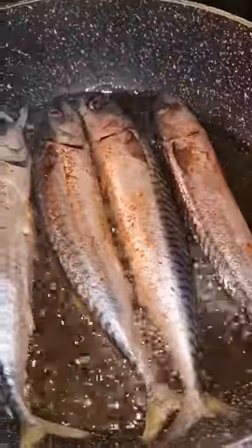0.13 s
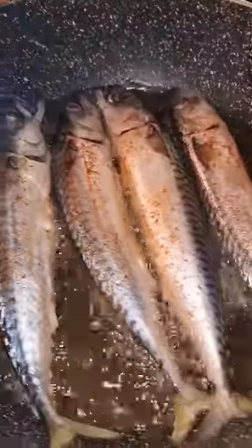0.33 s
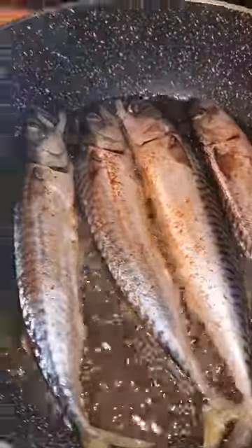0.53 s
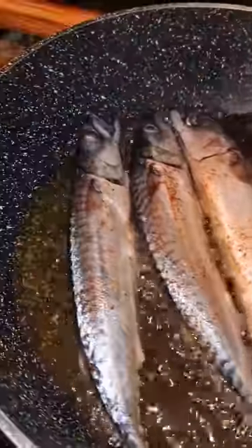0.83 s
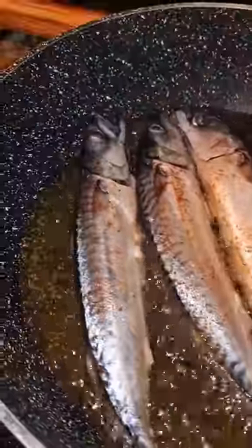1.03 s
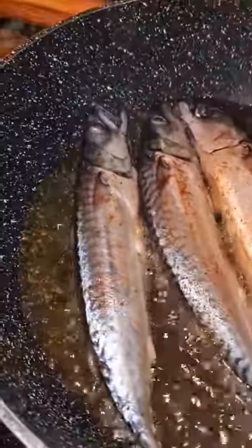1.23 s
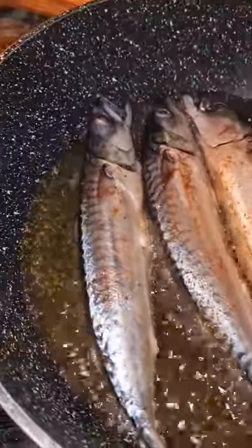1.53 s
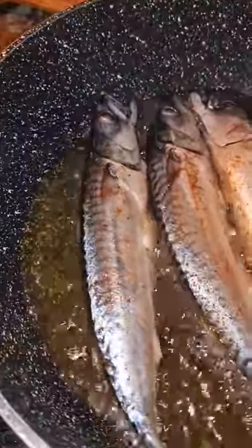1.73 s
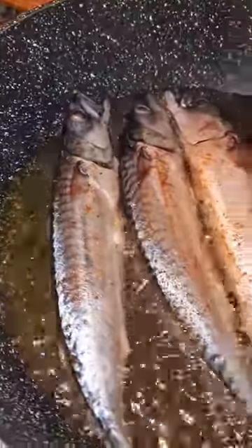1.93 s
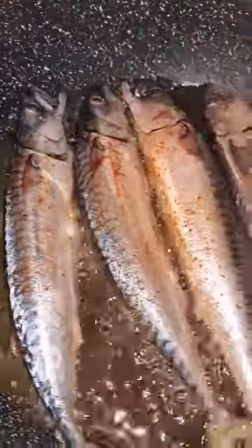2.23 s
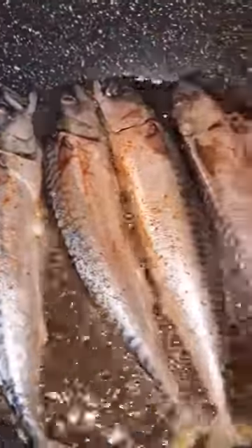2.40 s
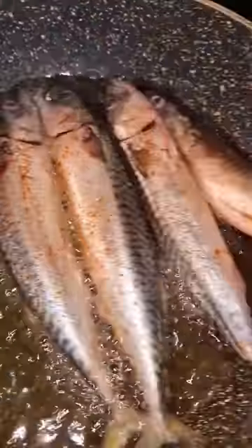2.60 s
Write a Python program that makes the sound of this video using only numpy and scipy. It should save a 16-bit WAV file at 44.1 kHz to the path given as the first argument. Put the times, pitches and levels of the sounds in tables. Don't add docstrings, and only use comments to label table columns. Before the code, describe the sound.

Whole fish fry in bubbling oil, fizzing densely from start to end while larger bubbles pop, the metal pan pings and droplets snap; recorded very close indoors, with dull handling bumps over a quiet low kitchen rumble.

```python
import sys
import numpy as np
from scipy import signal
from scipy.fft import rfft, irfft
from scipy.io import wavfile

SR = 44100
rng = np.random.default_rng(int(sys.argv[2]) if len(sys.argv) > 2 else 0)


def invert_db(x):
    u = np.asarray(x, float) / 20
    return 10 ** u


def unload_audio(sound):
    columns = np.transpose(np.atleast_2d(sound))
    steps = np.round(np.clip(columns, -1, 1) * 32767)
    wavfile.write(sys.argv[1], SR, steps.astype(np.int16))


N = 121716

# (time [s], level [dB])
BOIL = [
    (0.0, -24),
    (0.15, -24),
    (0.15, -23),
    (1.1, -26.5),
    (1.53, -26.5),
    (1.72, -25.5),
    (2.17, -28),
    (2.24, -25),
    (2.76, -25.5),
]
# (frequency [Hz], level per Hz [dB])
SIZZLE_COLOUR = [(350, 1), (480, -21.5), (1100, -7), (2600, -2.5), (8600, -5.5), (9700, -13.5),
                 (15000, -13), (16000, -6)]
# (frequency [Hz], width [Hz], level [dB])
PAN_RINGS = [(1177, 90, 6.5), (2220, 40, -2.5), (3024, 62, 0.5)]
# (frequency [Hz], left minus right [dB])
LEFT_LEAN = [(60, 2), (300, -10), (650, 6), (1400, 5.5), (2800, 0), (6000, 3), (15000, 5)]
# (frequency [Hz], likeness [0-1])
LIKENESS = [(60, 1), (180, 1), (550, 0.62), (1100, 0.42), (2500, 0), (6000, 0.09)]
# (frequency [Hz], phase [radians])
LEFT_LEAD = [(300, -0.31), (950, 1), (1210, 2.35), (1640, -1.1), (2150, -2.1)]
# (time of peak [s], peak level [dB], pitch [Hz])
POPS = [(.0205,-14,1200),(.1337,-14.5,1400),(.1452,-20,1290),(.1916,-15.5,1600),(.2928,-14.5,1090),(.3652,-17.5,1170),
        (.5512,-16,1400),(.5747,-16,1320),(.7283,-21,1043),(.791,-18,1790),(1.0536,-12,1730),(1.117,-23.5,600),
        (1.4572,-12.5,1380),(1.7011,-12.5,1400),(1.7176,-11.5,1870),(1.7395,-18,1330),(1.8573,-17.5,1280),(1.873,-7,1760),
        (1.8722,-15.5,1170),(1.9311,-19.5,960),(2.2903,-13.5,1720),(2.373,-21,1280),(2.4155,-19.5,810),(2.484,-22,930),(2.5692,-12.5,1450),
        (.428,-27,1070),(.5725,-28,690),(.687,-31.5,700),(.874,-31,644),(.89,-25.5,512),(1.078,-21,880),(1.163,-23,1170),(1.232,-52,820),
        (1.434,-25,900),(1.612,-30,830),(2.232,-20.5,1100),(2.322,-28.5,900),(2.389,-20,1180),(2.597,-25.5,734)]
# (time of peak [s], peak level [dB], pitch [Hz])
PAN_POPS = [(.019,-16,2210),(.1053,-13.5,2286),(.1706,-22,3070),(.3846,-14,2880),(.4819,-14.5,2540),(.515,-17,2230),
            (.66,-18,2220),(.7308,-14.5,2220),(.8556,-11.5,2150),(.9,-13.5,2200),(.9309,-15,2200),(.9593,-12,2130),
            (.9698,-16,1930),(.9927,-14,3250),(1.0157,-12.5,2220),(1.0716,-11.5,2240),(1.3774,-15.5,2170),(1.4357,-9.5,2250),
            (1.5749,-13,2240),(1.654,-17,2390),(1.73,-15.5,2280),(1.829,-15.5,3140),(2.216,-10.5,2970),(2.3053,-13,2160),
            (2.4988,-17,2980),(2.627,-13,2130),(2.651,-21,1990),(2.6974,-21,2000)]
# (time of peak [s], peak level [dB], pitch [Hz])
WEAK_PAN_POPS = [(.052,-38,2220),(.437,-20,1980),(.488,-19,2300),(.521,-21,1590),(.534,-22,2220),(.552,-13,2190),(.611,-28,2200),
                 (.647,-17,2270),(.7135,-37,2170),(.752,-21,2210),(.79,-20,2260),(.822,-14,3400),(.845,-21,2000),(.945,-30,2100),
                 (1.135,-21,1930),(1.201,-17,2300),(1.256,-32,3100),(1.271,-25,2110),(1.278,-17,2070),(1.299,-13,3150),(1.345,-22,1830),
                 (1.585,-19.5,1820),(1.613,-25,2200),(1.702,-15,2960),(1.037,-16,2250),(1.829,-19,2300),(1.886,-22,3000),(1.943,-18,2220),
                 (1.983,-22.5,2170),(2.093,-20,2220),(2.121,-16,2200),(2.13,-18,3030),(2.19,-21.5,1650),(2.263,-19,3170),(2.322,-26,2920),
                 (2.36,-24,2940),(2.485,-21,2950),(2.515,-22,3080),(2.535,-27,3000),(2.603,-17,2070),(2.637,-19,2200),(2.635,-14,3130),
                 (2.663,-16.5,2030),(2.715,-14,2330)]
# (time of peak [s], peak level [dB], centre [Hz])
SPITS = [(0.0802,-10.5,4300),(0.105,-11.5,6700),(0.1394,-10,4200),(0.266,-16,4130),(0.39,-13,7460),(0.5612,-11.5,8300),
         (0.642,-13,4700),(0.6603,-11.5,6860),(0.818,-11.5,6300),(1.023,-12,5500),(1.06,-13,6400),(1.095,-17,7000),(1.304,-11,7500),(1.729,-28,7540),
         (1.845,-16,7400),(2.02,-14.5,3650),(2.0774,-15,4560),(2.2386,-13,5370),(2.2655,-15,4010),(2.2953,-17,8100),(2.33,-23,11000),
         (2.3674,-14,7660),(2.4,-11,12800),(2.398,-14,7500),(2.4206,-17,6960),(2.234,-20,13100)]
# (time [s], peak level [dB], pitch [Hz], length [s])
BUMPS = [(.005, -36, 314, 0.032), (0.192, -28.5, 126, 0.029), (0.209, -20.5, 183.3, 0.058),
         (0.235, -30.5, 175.7, 0.1), (.3, -31.5, 132, 0.11), (0.348, -20.5, 249, 0.044),
         (0.367, -23.5, 162, 0.033), (0.424, -23, 172, 0.015), (0.689, -32, 82, 0.058),
         (0.868, -24, 150, 0.048), (1.026, -27.5, 152, 0.025), (1.08, -20.5, 132, 0.024),
         (1.098, -20, 182, 0.041), (1.138, -25.5, 101, 0.052), (1.161, -30.5, 152, 0.054),
         (1.21, -24, 104, 0.062), (1.286, -35, 101.4, 0.098), (1.367, -30.5, 102, 0.038),
         (1.514, -33.5, 116, 0.017), (2.273, -18.5, 177, 0.013), (2.369, -35, 123, 0.055),
         (2.596, -33.5, 126, 0.022)]
# (frequency [Hz], level per Hz [dB])
RUMBLE_COLOUR = [(30, -5), (70, -18), (99, 3.5), (135, -10), (290, -9), (500, -20)]


def evened(x):
    return x / np.sqrt(np.mean(x ** 2) + 1e-20)


def read(points, hz):
    f, value = np.transpose(points)
    return np.interp(np.log(hz + 1), np.log(f + 1), value)


def add(mix, s, sound):
    part = mix[:, max(round(s * SR), 0):][:, :sound.shape[1]]
    part += sound[:, :part.shape[1]]


def shaped(x, gain):
    freqs = np.fft.rfftfreq(x.shape[-1], 1 / SR)
    return irfft(rfft(x) * gain(freqs), x.shape[-1])


def wander(top_hz, count):
    def drift(hz):
        return 1 / np.sqrt((hz + 1.4) * (1 + (hz / top_hz) ** 4)) * (hz > 3.0)
    return evened(shaped(rng.standard_normal((count, N)), drift))


def sides(left_minus_right_db):
    half = left_minus_right_db / 2
    return invert_db(np.array([[half], [-half]]))


def bubble(hz, cycles, rise=5.4):
    u = np.arange(0, 4, hz / cycles / SR * 2)
    shape = (1 - np.exp(-rise * u)) ** 1.3 * np.exp(-1.5 * u)
    return shape / shape.max() * np.sin(np.pi * cycles * u)


def pan_gain(hz):
    peaks = sum(invert_db(db) ** 2 / (1 + (2 * (hz - f) / width) ** 2) for f, width, db in PAN_RINGS)
    return np.sqrt(1 + peaks)


def fizz():
    bursts_per_s, cycles, spread_db = 16000, 6.2, 4
    kind = (32 * rng.random((2, N)) ** .4).astype(int)
    happens = rng.random((2, N)) < bursts_per_s / SR
    size = np.minimum(rng.exponential(1, (2, N)), 5)
    clicks = invert_db(spread_db * size) * happens * rng.choice([-1., 1.], (2, N))
    out = np.zeros((2, N))
    for k, hz in enumerate(np.geomspace(350, 15500, num=32)):
        grain = bubble(hz, cycles * (hz / 2000) ** 0.28)
        grain = grain / np.linalg.norm(grain) * np.sqrt(hz / (k + 1) ** 1.21)
        out += signal.oaconvolve(clicks * (kind == k), grain[None], axes=1)[:, :N]
    return evened(out)


def sizzle():
    fizz_db, hiss_db, clump_db, patch_db = -1, -2.5, 1.17, 2.0
    raw = invert_db(fizz_db) * fizz() + invert_db(hiss_db) * rng.standard_normal((2, N))

    def colour(hz):
        return invert_db(read(SIZZLE_COLOUR, hz)) * pan_gain(hz) / (1 + (420 / (hz + 1)) ** 6)

    oil = evened(shaped(raw, colour))
    clumps = clump_db * wander(51.6, count=1)
    patches = patch_db * wander(58, count=5)

    def octave(k):
        return lambda hz: np.clip(1 - abs(np.clip(np.log2((hz + 1) / 700), 0, 4) - k), 0, 1)

    oil = sum(shaped(oil, octave(k)) * invert_db(clumps + patch * 0.82 ** k) for k, patch in enumerate(patches))
    s, db = np.transpose(BOIL)
    return oil * invert_db(np.interp(np.arange(N) / SR, s, db) + 3.5)


def paired(x):
    def same(hz):
        return np.clip(read(LIKENESS, hz), 0, .999)
    shared = shaped(x[0], lambda hz: same(hz) * np.exp(-1j * read(LEFT_LEAD, hz)))
    own = shaped(x[1], lambda hz: np.sqrt(1 - same(hz) ** 2))
    return np.array([x[0], shared + own])


def crackle():
    snaps_per_s, cycles, level_db = 700, 2.06, -32.5
    chance = snaps_per_s / SR * invert_db(6.0 * wander(14, count=1)[0])
    size = np.minimum(rng.exponential(1, N), 3.5)
    clicks = invert_db(2.6 * size) * (rng.random(N) < chance)
    kind, out = rng.integers(0, 24, N), np.zeros((2, N))
    chatter = [PAN_RINGS[1 + k // 5][0] * rng.uniform(0.912, 1.083) for k in range(8)]
    for k, hz in enumerate(list(np.geomspace(900, 7000, num=16)) + chatter):
        longer = 1 + 2.06 * (k > 15)
        snap = bubble(hz, cycles * rng.uniform(1, 2.1) * longer)
        place = sides(read(LEFT_LEAN, hz) + 2 * rng.standard_normal())
        out += place * signal.oaconvolve(clicks * (kind == k), snap)[:N]
    return invert_db(level_db) * evened(out)


def pops(table, cycles, rise):
    puff_db, tick_db, splinter_db, splinter_s = -2.5, -8.5, -7.5, .012
    out, t = np.zeros((2, N)), np.arange(600) / SR
    noises, lucks = rng.standard_normal((60, 2, 600)), rng.random((60, 3, 3))
    for (s, db, hz), noise, luck in zip(table, noises, lucks):
        wobble = bubble(hz, cycles, rise)[:580]
        puff = shaped(noise, lambda f: 1 / (1 + (np.log((f + 1) / hz) / 1.38) ** 4))
        puff = puff * np.exp(-t / 0.0073) * np.minimum(t / 0.0015, 1)
        burst = invert_db(puff_db) * 4.1 / cycles * puff / abs(puff).max()
        burst[0, :len(wobble)] += wobble
        burst[1, 3:3 + len(wobble)] += wobble
        gains = invert_db(db) * sides(read(LEFT_LEAN, hz) + 0.71 * noise[0, 0])
        add(out, s - abs(wobble).argmax() / SR, gains * burst)
        add(out, s, gains * invert_db(tick_db) * bubble(2.34 * hz, 0.52)[None])
        for late, pitch, size in luck:
            splinter = bubble(hz * (1 + (pitch - .5) / cycles * 2), 0.69 * cycles)[None]
            add(out, s + splinter_s * (late * 1.3 - .3), gains * invert_db(splinter_db - 4.1 * size) * splinter)
    return out


def spits():
    snap_s, spray_s, level_db, spray_db, sharpness = 0.0021, 0.0067, 5.5, -0.5, 8.7
    out, t = np.zeros((2, N)), np.arange(1500) / SR
    for (s, db, hz), noise in zip(SPITS, rng.standard_normal((40, 2, 2, 1500))):
        snap = evened(shaped(noise[0], lambda f: 1 / (1 + (sharpness * (f - hz) / hz) ** 2)))
        snap = snap * np.exp(-t / snap_s) / 2
        spray = shaped(noise[1], lambda f: invert_db(read(SIZZLE_COLOUR, f))
                       / (1 + (np.log((f + 1) / hz) / 0.47) ** 4))
        spray = invert_db(spray_db) * spray * np.exp(-t / spray_s)
        gains = invert_db(db + level_db) * sides(read(LEFT_LEAN, hz))
        add(out, s - .0015, gains * (snap + spray) * np.minimum(t / 0.00063, 1))
    return out


def walls(x):
    fade_60db_s, level_db = 0.068, -7
    n = np.arange(4000)
    echoes = rng.standard_normal((2, 4000)) * (rng.random((2, 4000)) < .05)
    echoes = echoes * invert_db(-60 * n / SR / fade_60db_s)
    echoes[:, :30] = 0
    echoes = echoes / np.linalg.norm(echoes, axis=1)[:, None]
    return x + invert_db(level_db) * signal.oaconvolve(x, echoes, axes=1)[:, :N]


def bumps():
    rough_share, width_hz, swell, sag = 0.39, 140, 0.24, 0.087
    knock_db, push_db, side_db = -11.5, -10.5, -21
    out, t = np.zeros((2, N)), np.arange(8192) / SR
    opposite = np.array([[1], [-1]])
    for (s, db, hz, length), noise in zip(BUMPS, rng.standard_normal((40, 3, 8192))):
        rough = evened(shaped(noise[::2], lambda f: 1 / (1 + ((f - hz) / width_hz) ** 4)))
        knock = evened(shaped(noise[1], lambda f: f / (1 + (f / 450) ** 3) / (1 + (250 / (f + 1)) ** 2)))
        sagging = 1 + sag * (.4 - np.minimum(t / length, 1))
        phase = 2 * np.pi * hz * np.cumsum(sagging) / SR
        tone = np.sin(phase) + invert_db(push_db) * np.sin(0.453 * phase)
        onset = np.sin(np.pi / 2 * np.minimum(t / (0.00095 + swell * length), 1))
        shape = onset * np.exp(-(t / length) ** 2 * 1.56)
        body = tone + rough_share * rough[0] + invert_db(knock_db) * knock
        difference = invert_db(side_db) * opposite * (rough[1] + knock)
        add(out, s - .002, invert_db(db + 1.0) * shape * (sides(0.72) * body + difference))
    return out


def rumble():
    def colour(hz):
        return invert_db(read(RUMBLE_COLOUR, hz)) / (1 + (hz / 500) ** 6) * (hz > 18)
    noise = shaped(paired(rng.standard_normal((2, N))), colour)
    return invert_db(-46) * evened(noise) * invert_db(2.6 * wander(9.5, count=1))


def scene():
    half = np.array([[.5], [-.5]])
    oil = shaped(paired(walls(sizzle())), lambda hz: invert_db(half * read(LEFT_LEAN, hz)))
    bursts = pops(POPS, cycles=4.1, rise=1.1)
    bursts += pops(PAN_POPS, cycles=11.0, rise=2.2)
    bursts += pops(WEAK_PAN_POPS, cycles=9.0, rise=2.2)
    return oil + walls(bursts + spits() + crackle()) + bumps() + rumble()


def band_limit(x):
    return signal.sosfilt(signal.butter(12, 16140, fs=SR, output="sos"), x)


def record(dry):
    low_hz, high_hz, ceiling = 35, 15200, .92
    cut = shaped(dry, lambda hz: 1 / (1 + (hz / high_hz) ** 160) / (1 + (low_hz / (hz + 1)) ** 4))
    soft = cut / (1 + (cut / ceiling) ** 4) ** .25
    return band_limit(soft)


dry = scene()
out = record(dry)
unload_audio(out)
```